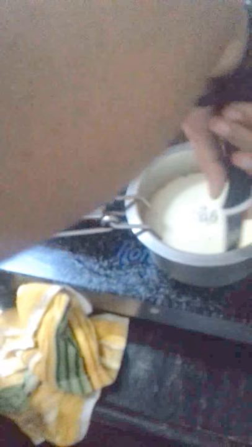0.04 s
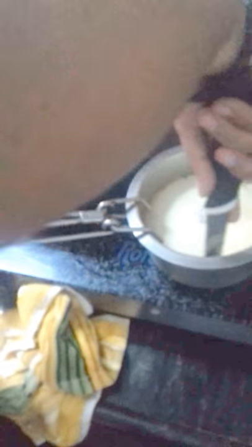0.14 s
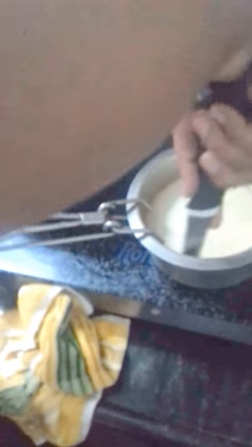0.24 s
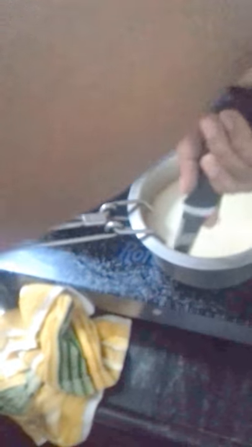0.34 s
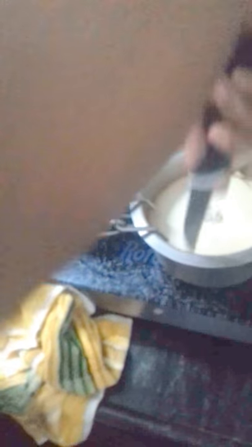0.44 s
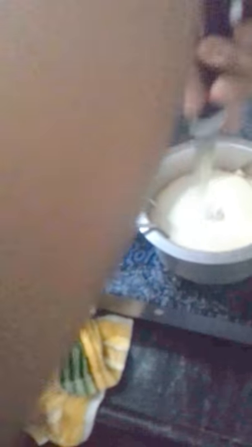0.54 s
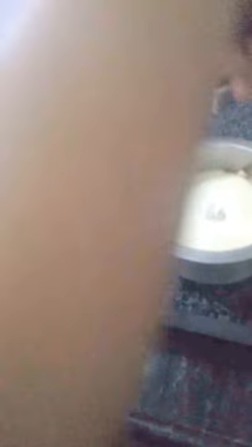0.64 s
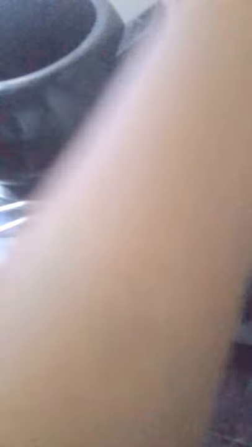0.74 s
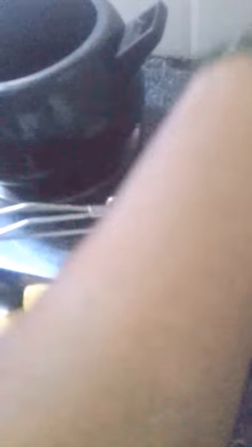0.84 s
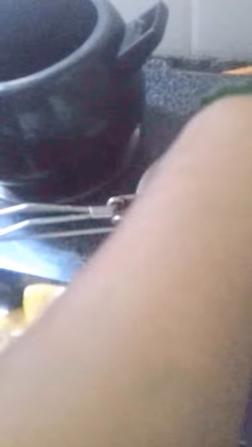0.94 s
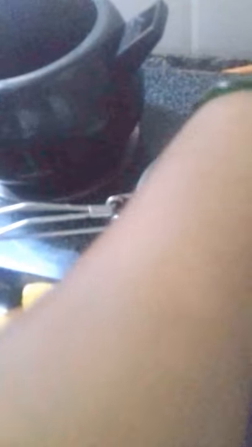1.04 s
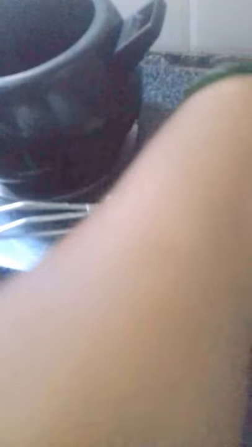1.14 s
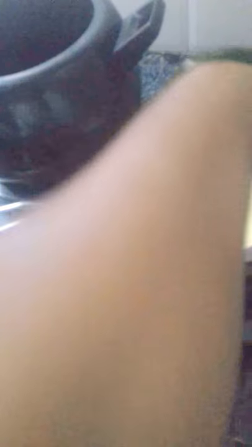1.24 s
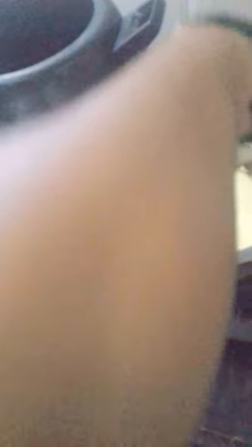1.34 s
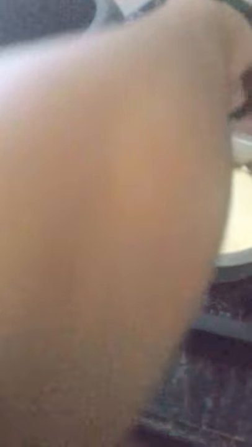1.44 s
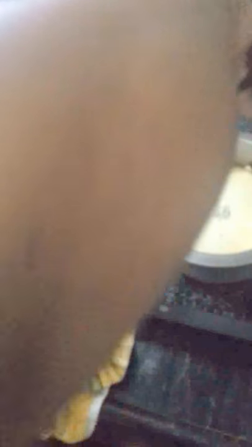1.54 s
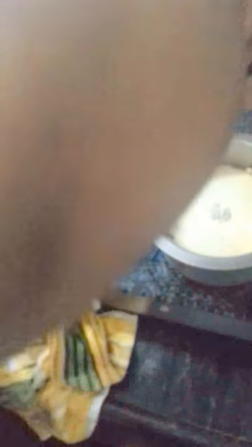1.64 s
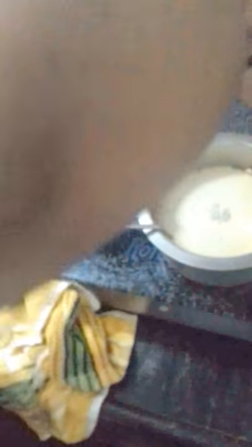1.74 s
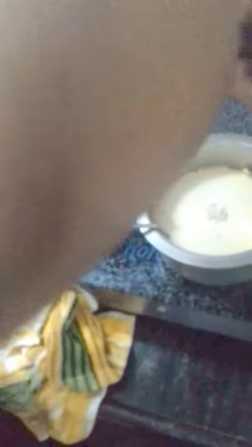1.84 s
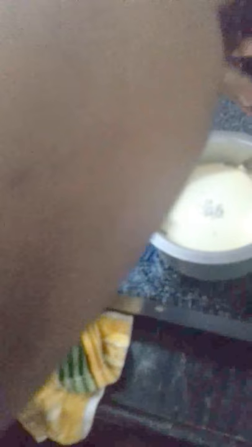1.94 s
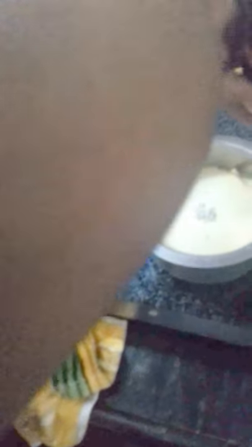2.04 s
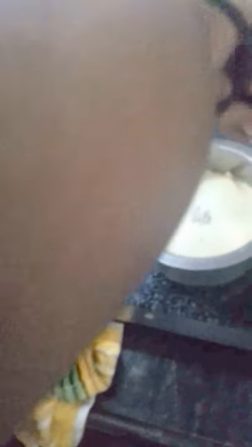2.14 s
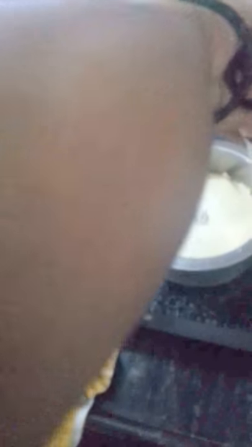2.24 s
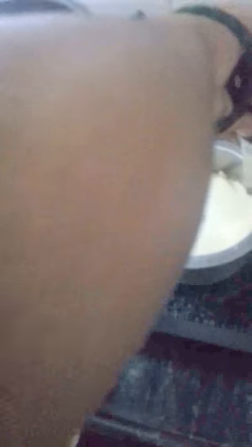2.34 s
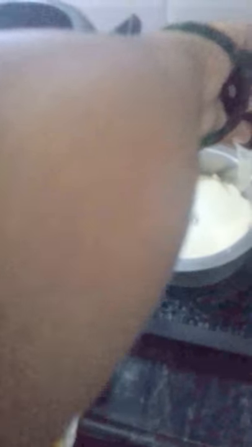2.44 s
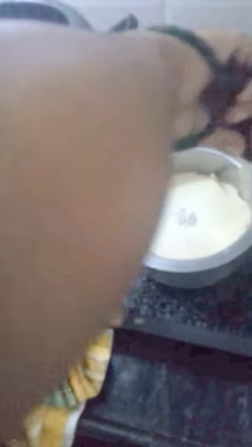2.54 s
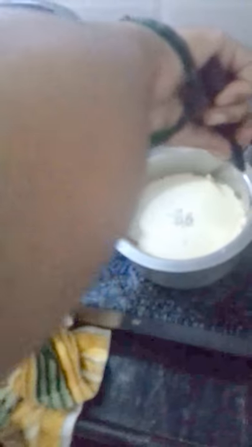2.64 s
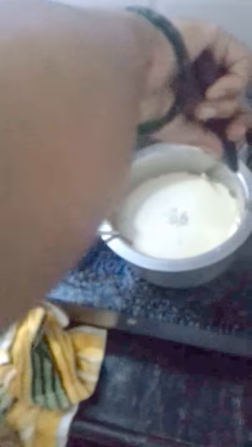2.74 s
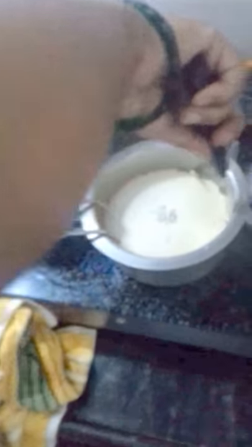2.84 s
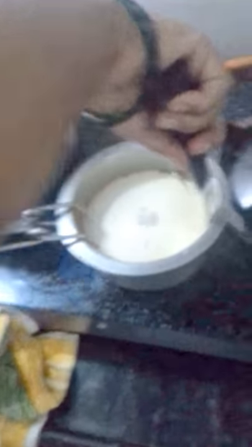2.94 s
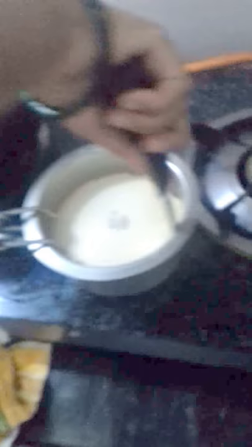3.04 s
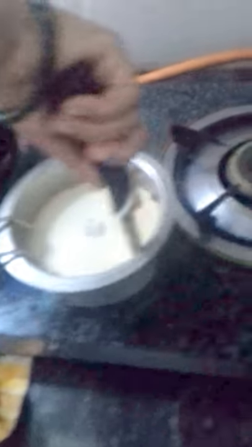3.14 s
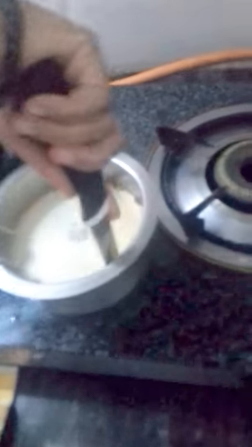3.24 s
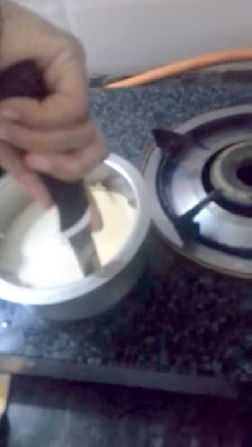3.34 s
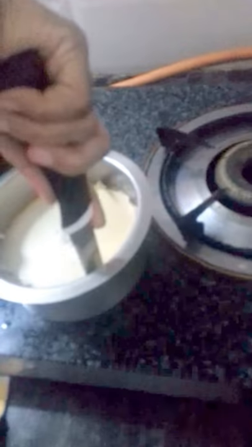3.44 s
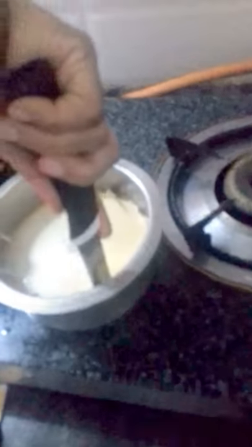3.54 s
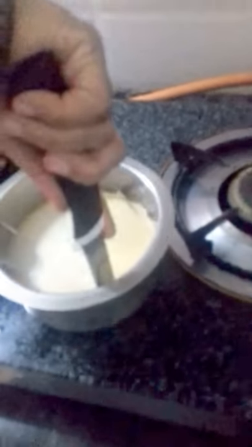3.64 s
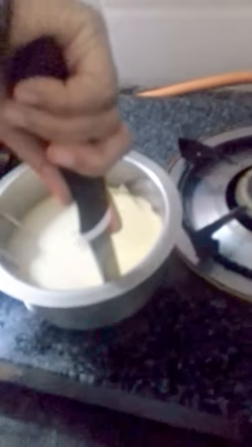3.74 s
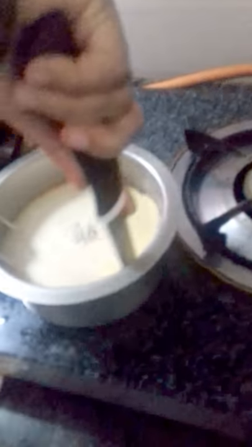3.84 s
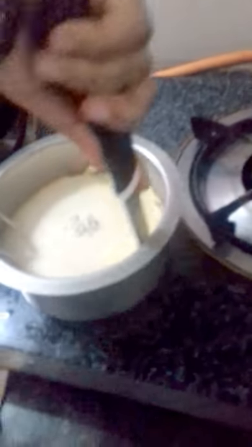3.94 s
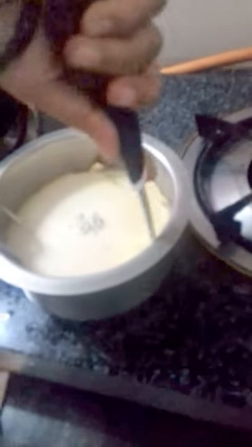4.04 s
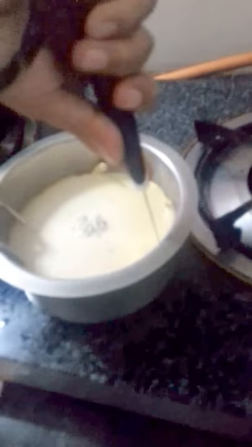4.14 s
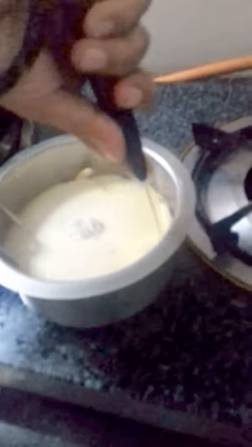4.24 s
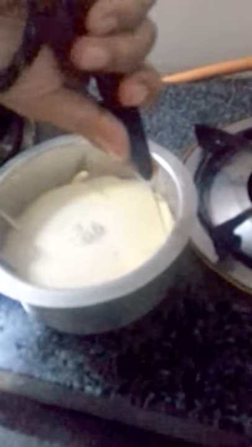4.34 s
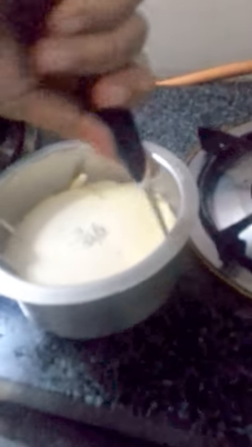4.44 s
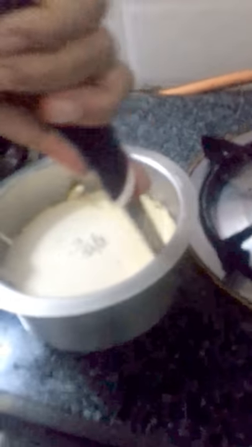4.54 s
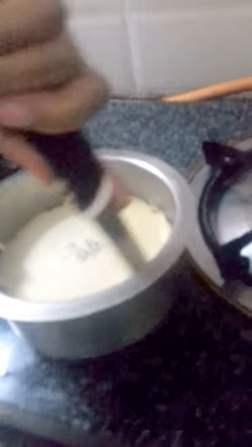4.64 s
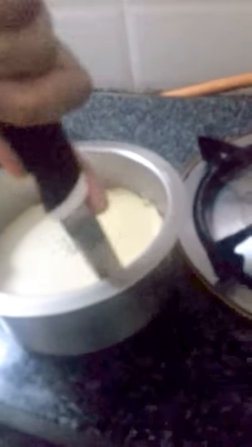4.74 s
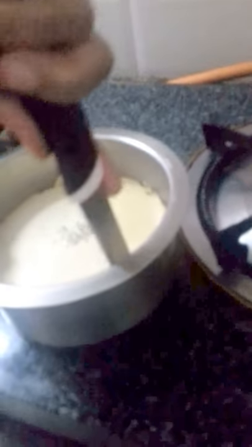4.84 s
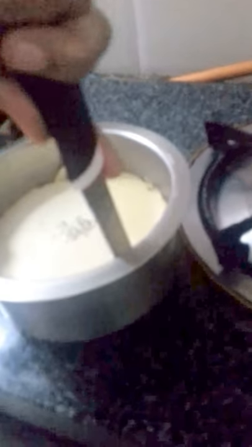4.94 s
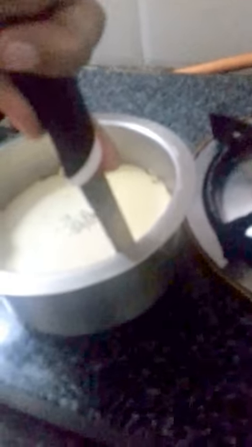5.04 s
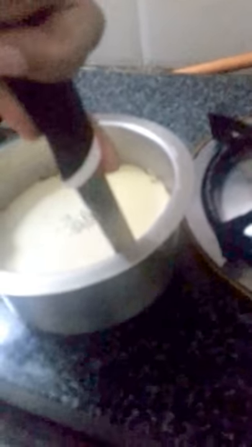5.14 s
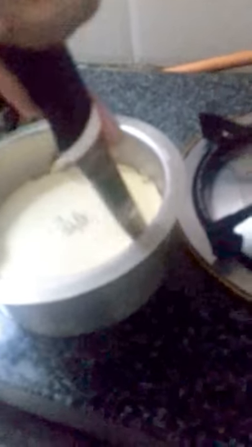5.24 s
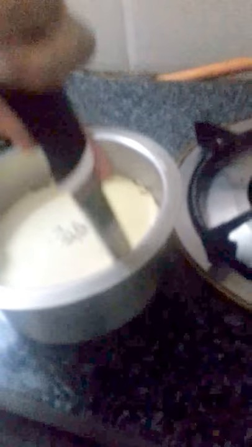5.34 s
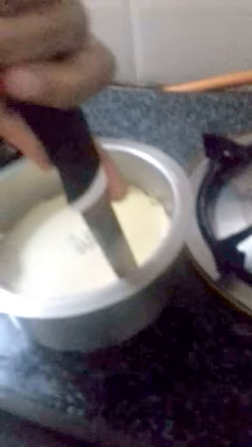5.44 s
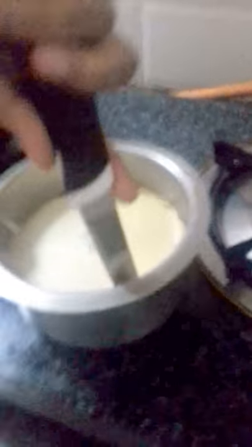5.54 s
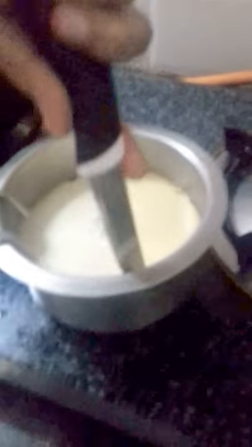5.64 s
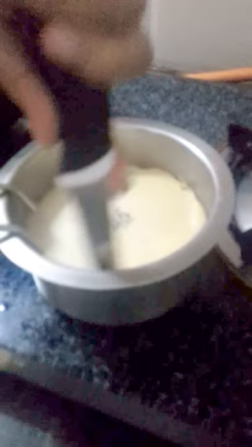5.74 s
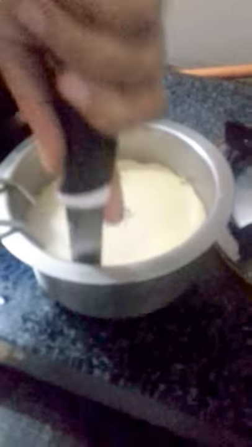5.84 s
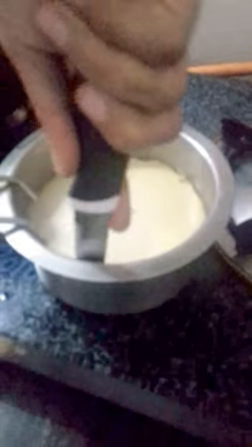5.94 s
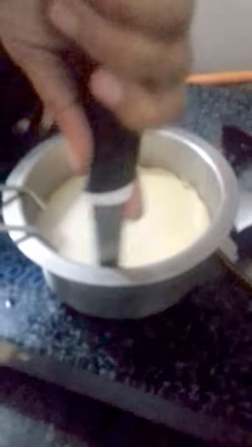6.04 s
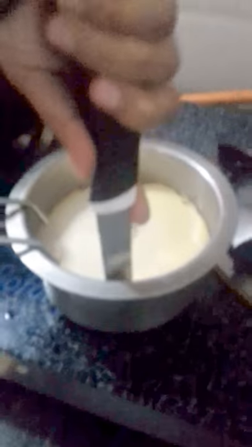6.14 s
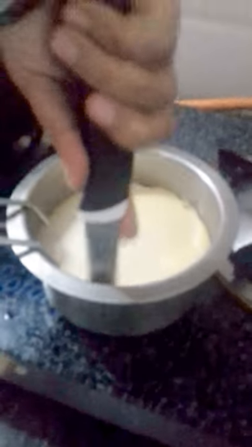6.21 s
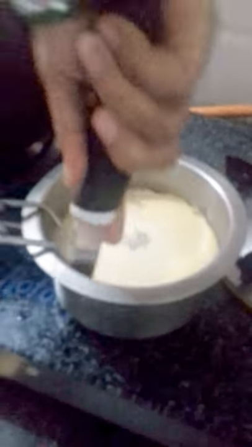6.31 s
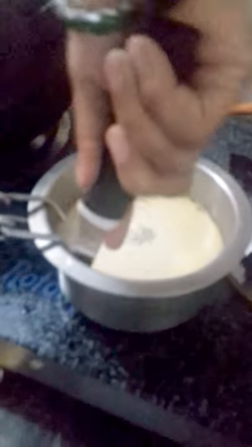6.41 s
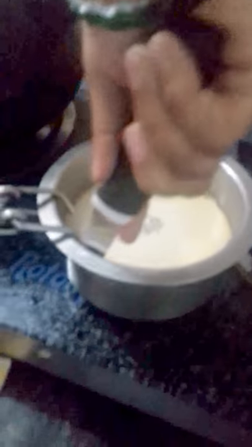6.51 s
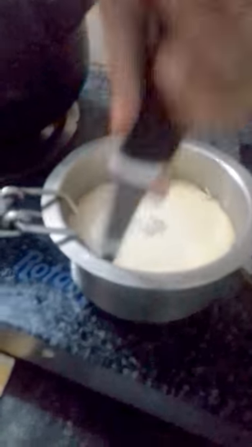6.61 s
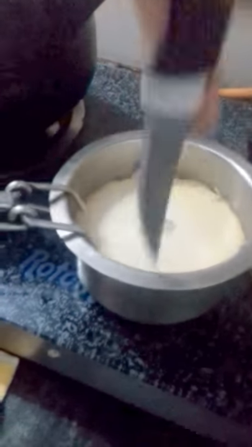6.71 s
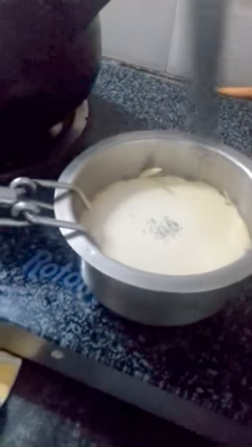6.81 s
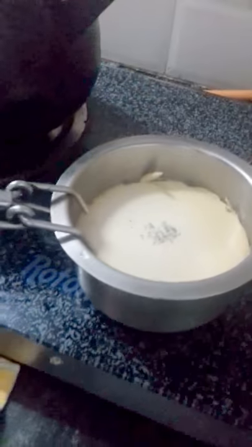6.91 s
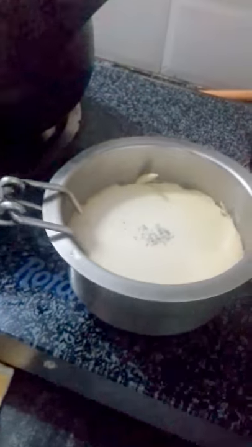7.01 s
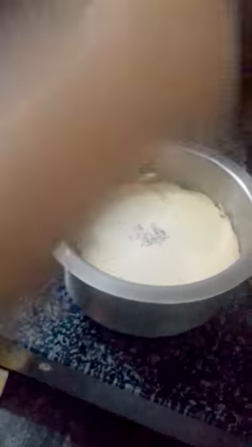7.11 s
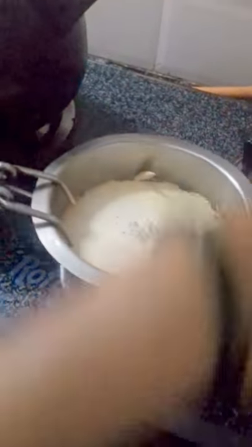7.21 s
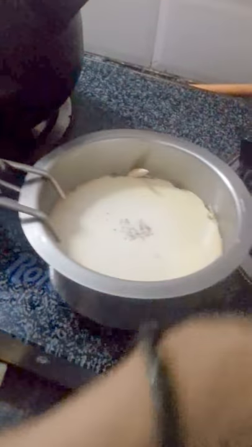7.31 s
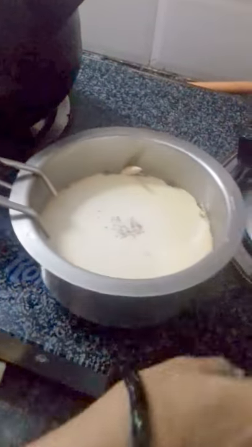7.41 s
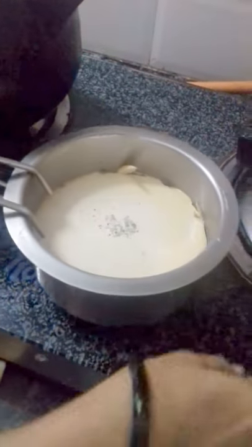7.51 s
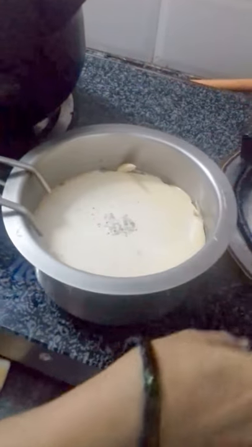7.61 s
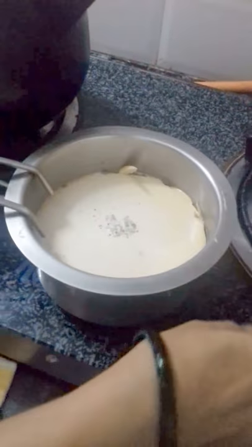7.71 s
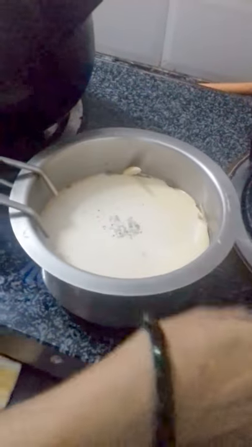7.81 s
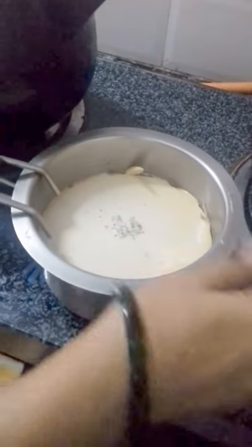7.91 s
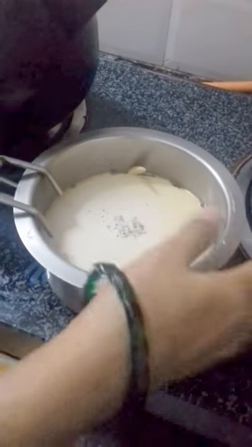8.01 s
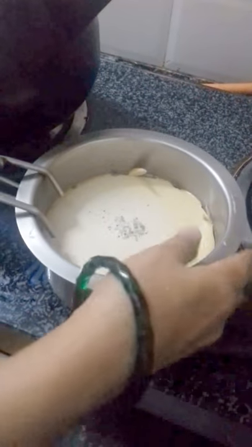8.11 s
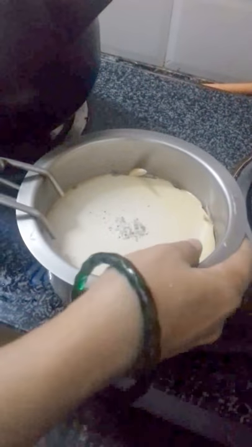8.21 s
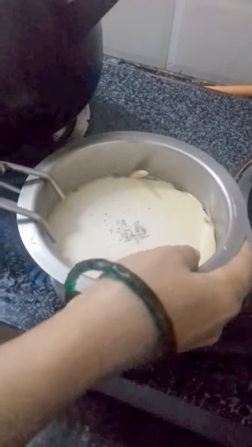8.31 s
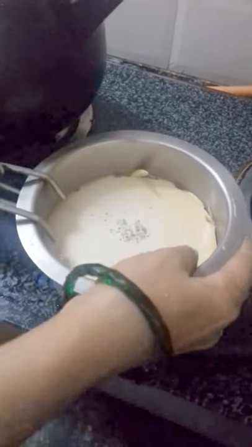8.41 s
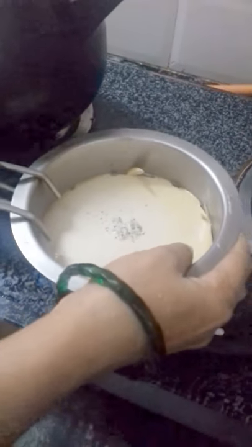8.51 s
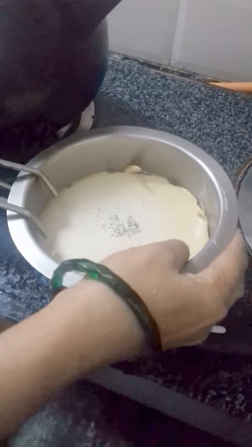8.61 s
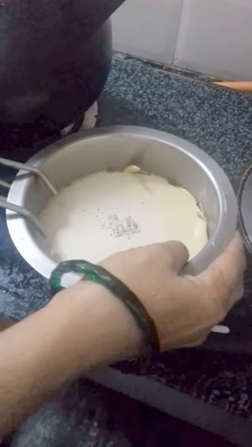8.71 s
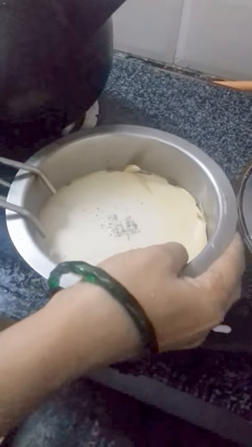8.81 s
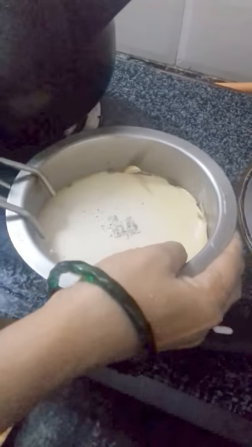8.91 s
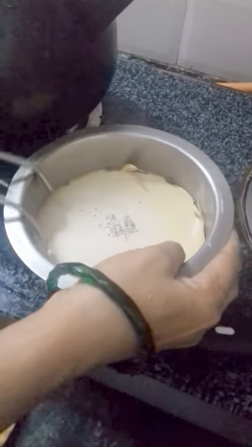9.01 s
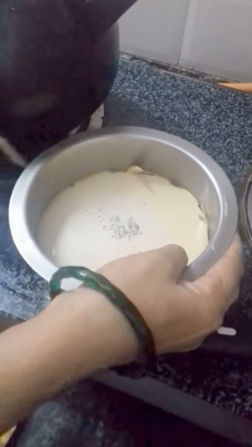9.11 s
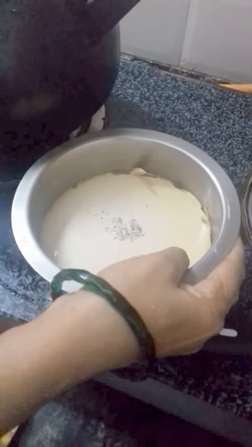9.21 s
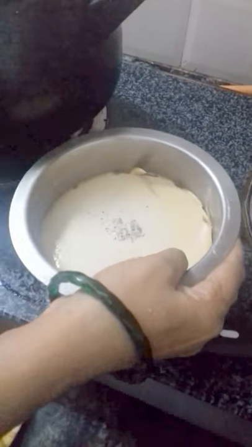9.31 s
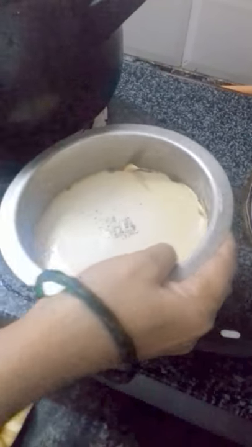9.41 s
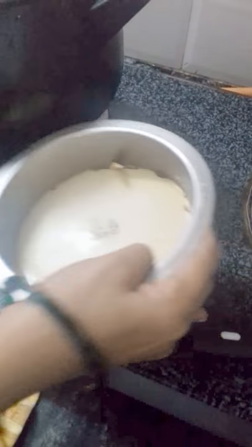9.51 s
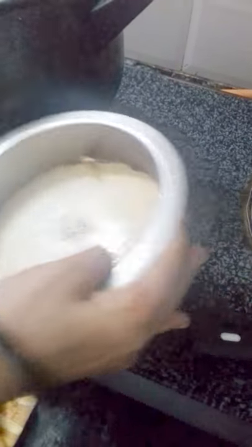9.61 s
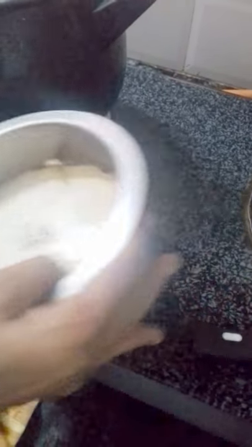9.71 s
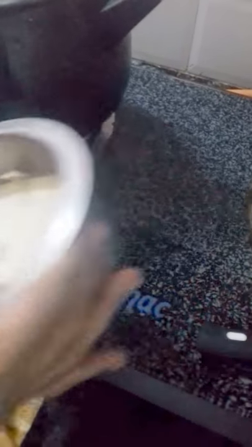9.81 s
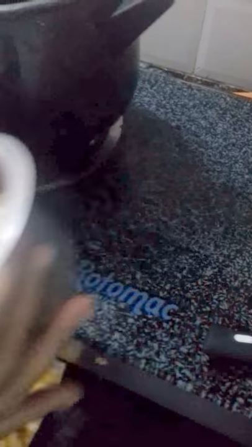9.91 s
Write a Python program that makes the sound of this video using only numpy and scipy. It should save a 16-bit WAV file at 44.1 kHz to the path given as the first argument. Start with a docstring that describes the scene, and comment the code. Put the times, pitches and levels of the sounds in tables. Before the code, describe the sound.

A blade works around the wall of a steel pot in uneven, raspy strokes with small clicks and several knocks of the pot against stone. After a quick upward squeal of metal, utensils land on the counter with a louder clatter, followed by a glassy clink and soft settling ticks. The sounds are near and sharp through a small microphone, with a short kitchen echo and a faint appliance hum.

```python
"""A knife loosens a cake from a steel pot in a quiet, tiled kitchen with a faint hum.
First the blade scrapes and ticks round the wall, and now and then the pot knocks on the stone counter.
Near 6.7 s the blade slides out with a rising squeal. From 7.5 s knife and tongs clatter down,
and a glass bangle clinks on steel. A small microphone makes the sounds near 3-4.5 kHz stand out."""
import sys
import numpy as np
from scipy import signal
from scipy.fft import rfft, irfft
from scipy.io import wavfile

SR = 44100
rng = np.random.default_rng(int(sys.argv[2]) if len(sys.argv) > 2 else 0)


def transcribe(u):
    """Save the signal u as a 16-bit wav file named by the first command-line argument.

    u: samples, shape (n,) or (channels, n), limited to [-1, 1]; the rate is SR.
    q: integer samples, one column per channel.
    """
    v = np.clip(np.atleast_2d(u).T, -1, 1)
    q = np.round(v * 32767).astype(np.int16)
    wavfile.write(sys.argv[1], SR, q)


N = 439236

# Levels compare the rows of a table. A ring_s or rattle_s is the time to fade by 60 dB.
# tone of the distant noise, and of a hiss that differs left and right: pitch_hz, level_db
DISTANT_TONE = [(15, -39), (25, -7), (149, -6), (223, -5.5), (285, -4.5), (405, -3.5), (516, -3.5),
                (714, -1), (818, -16.5), (887, -18), (1020, -4.5), (2840, -16.5), (3920, -13),
                (6050, -24.5), (16000, -28)]
HISS_TONE = [(20, -10.5), (60, -3), (150, -0.5), (500, -1.5), (1500, -2), (4000, -8), (8000, -12),
             (16000, -13.5)]
# slow drift of the distant noise: time_s, level_db
DISTANT_DRIFT = [(0, -61.5), (1.5, -63.5), (4, -62), (6.5, -64), (9.96, -63.5)]
# wavering motor tones: pitch_hz, width_hz, level_db
WAVERING_HUMS = [(459, 10, -72), (560, 14, -83.5), (819, 11, -73), (967, 33, -74)]
# steady motor tones: pitch_hz, level_db
STEADY_HUMS = [(47, -83.5), (141, -81.5), (282, -75)]
# six bands the microphone passes unequally (low, body, middle, presence, bite, treble): low_hz, high_hz
BANDS = [(275, 704), (700, 1260), (1400, 2900), (3000, 4490), (4750, 7000), (8500, 16000)]
# the room's echo, one value a band: ring_s in the first list, level_db in the second
ECHO_RING_S = [0.36, 0.45, 0.55, 0.62, 0.51, 0.33]
ECHO_DB = [3.5, -2.5, -5, -9.5, -8, -4.5]

# the notes each object rings with: pitch_hz, level_db, ring_s (blows and scraping can shorten the ring)
POT_NOTES = [(830, -6, .06), (1050, -6, .08), (1615, -4, .2), (2050, -4, .1), (2358, -4, .2),
             (3160, -6, .12), (3400, -5, .08), (3628, -4, .07), (3950, -4, .08), (4081, -8, .15),
             (4190, -4, .08), (4350, -6, .1), (4506, -8, .1), (5000, -10, .08), (5950, -10, .04),
             (7200, -3, .03), (9300, -2, .035), (12600, 4, .03), (14900, -5, .03)]
COUNTER_NOTES = [(230, -3.5, .14), (308, 10.5, 0.011), (353, 12, 0.36), (421, 6.5, 0.18), (445, -16, 0.047),
                 (580, 2, 0.1), (707, -14, .08), (819, 12, 0.064), (900, 9, 0.27), (1000, -10, 0.089),
                 (1135, -17, .08), (1287, -27, .06), (1933, 5, .06)]
TOOL_NOTES = [(270, 1, 0.75), (345, 11, 0.35), (430.5, 2, .2), (599, 7, 0.3), (685, 8.5, 0.6),
              (816.5, 15, 0.1), (1010, 2.5, .25), (1208, -7, 0.097), (1590, -3.5, 0.26), (1940, 3, 0.45),
              (2354, -4.5, 0.11), (2649.5, 6, 0.12), (2720, -10, 0.11), (3260, 1.5, 0.17), (3040, -18, .17),
              (3450, -0.5, .15), (3335, -2, 0.11), (3570, -9, 0.096), (3920, -4, 0.26), (3890, 14, 0.6),
              (4580, -6, 0.13), (4674, -11, 0.067), (5100, -32.5, 0.11)]
BANGLE_NOTES = [(6800, 12, 0.054), (8930, 13, 0.15), (11500, -1, 0.044), (13500, -3, 0.033)]
HANDLE_NOTES = [(760, 1.5, 0.061), (1020, -11, 0.032)]
# light taps: start_s, level_db
BANGLE_TAPS = [(8.1628, -38), (8.4731, -60)]  # glass on steel
HANDLE_TAPS = [(7.557, -24), (7.612, -36), (7.647, -38), (7.664, -34), (7.69, -40), (7.745, -29),
               (9.078, -42), (9.125, -45)]  # handle on stone
# blows: start_s, presence_db, low_db, middle_db, treble_db, rattle_s
SHARP_TICKS = [(0.4804, -41, -47.5, -61, -58, 0.016), (0.5872, -41, -64, -43.5, -73.5, 0.021),
               (2.7442, -44, -52, -72, -56, 0.014), (3.2906, -43, -53, -45.5, -63, 0.041),
               (3.5779, -39, -50, -37, -73, 0.037), (4.0717, -35, -68, -48, -75, 0.017),
               (4.255, -30.5, -48.5, -59, -60, 0.014), (4.3934, -37.5, -65, -48, -55, 0.023),
               (4.4453, -27.5, -65, -39, -62, 0.0085), (5.256, -24, -64, -40, -44, 0.0073),
               (5.9235, -33, -57, -41, -62, 0.014), (6.2807, -30, -48, -45, -65, 0.039),
               (6.3276, -30, -34.5, -31.5, -50, 0.026), (6.3586, -42, -42, -64, -45, 0.022),
               (6.4644, -46, -44.5, -43.5, -59, 0.025), (6.545, -45, -56, -63, -63, 0.018),
               (6.6245, -48, -48, -49.5, -72, 0.058), (6.6785, -40, -65, -61, -58, 0.016),
               (6.712, -40, -66, -61, -58, 0.016), (9.2424, -46, -63, -58, -52, 0.027)]  # blade on the pot wall, and one last bright click as the tools settle
RIM_CLINKS = [(0.4579, -44, -70, -50, -63, 0.012), (0.4984, -46, -58, -40, -66, 0.012),
              (1.0877, -32, -53, -43, -41, 0.029)]  # blade on the bare rim, which rings on
POT_KNOCKS = [(0.6563, -62, -38, -66, -76, 0.032), (4.4831, -23, -26, -35, -38.5, 0.034),
              (4.9534, -33, -34, -37.5, -48, 0.032), (5.4035, -21, -25, -27, -40.5, 0.033),
              (6.0879, -44, -27.5, -50, -70, 0.059)]  # pot rocks onto the counter
TOOL_CLATTER = [(7.557, -20.5, -36.5, -21.5, -59, 0.059), (7.6107, -21.5, -37.5, -28, -42, 0.049),
                (7.646, -32.5, -41.5, -31.5, -41, 0.045), (7.6694, -37, -35, -49, -55, 0.11),
                (7.7444, -32.5, -39, -34.5, -48, 0.083), (7.7697, -7.5, -27, -17, -62, 0.17),
                (7.7991, -18.5, -22.5, -16, -36, 0.12), (8.1628, -22.5, -48.5, -27, -34, 0.014),
                (8.1744, -37, -39, -33.5, -65, 0.17), (8.2592, -40.5, -40.5, -39, -77, 0.029),
                (8.4714, -33.5, -71, -34, -55, 0.071), (8.4995, -45.5, -44, -63.5, -73.5, 0.064),
                (8.961, -51, -44.5, -70, -64, 0.065), (8.984, -45.5, -44.5, -49, -69, 0.035),
                (9.0295, -46, -68, -40, -64, 0.032), (9.0503, -33.5, -83, -33.5, -57, 0.021),
                (9.0773, -44, -43, -50, -53, 0.065), (9.1165, -34.5, -74, -53, -65, 0.028),
                (9.134, -42, -65, -54, -68, 0.025), (9.1451, -34.5, -69, -60, -68, 0.031)]  # knife and tongs land on the counter

# the blade slides out: time_s, level_db, pitch_factor
BLADE_SLIDE = [(6.62, -96, 1.0), (6.66, -72, 1.1), (6.71, -50, 1.07), (6.755, -51.5, 1.22),
               (6.775, -52, 1.24), (6.8, -78, 1.25)]
# the notes it sings: pitch_hz, level_db, width_hz, share_of_rise
BLADE_NOTES = [(780, -8, 37, 0), (2750, -10, 200, 0.74), (3650, -1, 250, 0.82), (4400, -1.5, 220, 0.81),
               (6570, -12, 120, 0.035), (9240, -18, 120, 0.056)]
# pushes of the blade on steel, the last ones the pot dragging on the stone counter (middle and treble add to
# level): start_s, rise_s, hold_s, fall_s, level_db, middle_db, treble_db, edge_pitch_hz
PUSHES = [(0.0, 0.084, 0.12, .03, -52.5, -7.5, -25, 3840), (.19, 0.089, 0.043, 0.046, -40, -12, -27, 3600),
          (0.344, .03, 0.055, 0.04, -55, -9, -14, 3900), (0.423, 0.034, .015, .02, -46.5, -8, -17, 3820),
          (0.471, .008, 0.014, 0.018, -36, -8.5, -24, 4100), (1.1, 0.0083, .02, 0.18, -52, -11, -18, 3930),
          (1.235, 0.026, .06, .05, -63, -11, -18, 3970), (1.38, 0.042, 0.032, .03, -63, -5, -16, 3940),
          (1.458, .02, .035, 0.034, -58.5, -11, -18, 3880), (1.606, 0.1, .01, .07, -61, -9, -23, 3880),
          (1.913, 0.074, 0.0093, 0.048, -52.5, -12, -23, 3700),
          (2.081, 0.017, .005, 0.022, -55, -24, -21, 3560),
          (2.132, 0.019, 0.044, .06, -57.5, -9, -30, 3650),
          (2.306, 0.027, .005, 0.042, -54, -11, -18, 3880),
          (2.516, 0.07, 0.069, 0.035, -47, -2.5, -23.5, 3740),
          (2.72, 0.027, 0.0045, 0.022, -53.5, -7, -19, 3940),
          (2.879, 0.036, 0.027, 0.018, -50.5, -7, -22, 3850), (2.956, 0.048, .005, .02, -52, -8, -21, 4020),
          (3.061, 0.023, 0.082, 0.059, -47.5, -12.5, -26, 4030),
          (3.152, 0.03, .03, .03, -40, -12, -27, 3920), (3.24, .035, 0.019, 0.035, -48, -9.5, -23, 3930),
          (3.344, 0.033, 0.036, 0.039, -48.5, -7, -20, 3850),
          (3.501, 0.044, .005, 0.025, -57, -5, -33, 3520),
          (3.59, 0.13, 0.018, 0.028, -60.5, -12, -31, 3570),
          (3.784, 0.051, .005, 0.055, -38, -9.5, -31, 3280), (3.839, .01, 0.056, .03, -44, -8.5, -35, 3300),
          (3.906, .02, 0.054, .025, -54, -10, -29, 3240), (4.07, .015, 0.043, 0.13, -69, -2, -25, 4050),
          (4.17, 0.033, 0.038, .02, -53, -7, -30, 3600), (4.223, 0.059, .005, 0.12, -41.5, -5.5, -32, 3480),
          (4.567, 0.051, .01, 0.12, -49, -9, -25, 3530), (4.636, .1, 0.012, 0.035, -47, -11.5, -26, 3420),
          (4.782, 0.022, .005, 0.024, -46, -13, -27, 3730),
          (4.854, 0.015, 0.0044, .015, -53.5, -18, -25, 3840),
          (4.885, 0.013, 0.0039, 0.011, -55, -20, -30, 3880),
          (5.219, 0.013, .006, .015, -50, -20, -25, 4000),
          (5.251, 0.0034, .006, 0.028, -37.5, -13.5, -30, 3650),
          (5.353, 0.029, .005, 0.013, -52.5, -8, -20, 3990),
          (5.467, 0.042, 0.011, 0.056, -57.5, -20, -14, 3890),
          (5.52, 0.039, 0.082, 0.36, -55.5, -7.5, -23, 3400),
          (5.766, 0.03, .01, .015, -44.5, -13, -17, 3800), (5.801, 0.02, 0.02, 0.038, -41, -8, -15.5, 3770),
          (5.885, 0.025, 0.015, 0.0078, -41, -4, -19, 4200),
          (6.089, 0.0093, 0.048, 0.024, -48.5, -5.5, -12.5, 4030),
          (6.226, 0.048, 0.0043, 0.053, -42, -7, -17.5, 3670),
          (6.302, 0.023, 0.041, 0.062, -36, -11, -27, 4400),
          (6.402, 0.032, 0.011, .03, -47.5, -8, -18, 3970),
          (6.577, 0.055, 0.047, 0.027, -47.5, -15.5, -22, 4170),
          (6.674, 0.027, 0.074, .03, -50.5, -10, -12, 4700),
          (7.625, 0.031, .005, 0.035, -34.5, -4.5, -34, 4270),
          (8.162, 0.0092, 0.0061, .045, -31, -2.5, -23, 3380),
          (9.094, .04, .01, 0.032, -47.5, -4.5, -17, 3970)]
# how strongly the wall's highest notes sing under the blade: time_s, level_db
TREBLE_SINGING = [(0, -4), (3.5, -1), (3.9, 2.5), (5.6, 4), (5.8, -3), (6.4, 5), (6.8, -23), (7, -12.5),
                  (9.96, -18.5)]


def amp(db):
    """Turn decibels into a gain."""
    return 10 ** (np.asarray(db) / 20)


def rms_one(x):
    """Scale a signal to an average power of 1."""
    return x / np.sqrt(np.mean(x ** 2) + 1e-20)


def in_time(rows):
    """Join timed points with straight lines, one curve a column."""
    times_s, *columns = np.transpose(rows)
    return [np.interp(np.arange(N) / SR, times_s, column) for column in columns]


def band_of(hz):
    """Pick the band, 0 to 5, for a pitch."""
    return int(np.searchsorted([720, 1400, 2800, 5400, 8500], hz))


def ring(x, hz, ring_s):
    """Each click in x starts a fading note."""
    decay, angle = amp(-60 / (ring_s * SR)), 2 * np.pi * hz / SR
    return signal.lfilter([.5, 0, -.5], [1, -2 * decay * np.cos(angle), decay ** 2], x + 1e-18)


def clicks(taps):
    """Place one click for each tap."""
    out = np.zeros(N)
    for start_s, level_db in taps:
        out[round(start_s * SR)] = amp(level_db)
    return out


def shaped_noise(tone):
    """Steady noise with the given level at each pitch."""
    hz, level_db = np.transpose(tone)
    all_hz = np.fft.rfftfreq(N, 1 / SR) + 1
    gains = amp(np.interp(np.log(all_hz), np.log(hz), level_db))
    return rms_one(irfft(rfft(rng.standard_normal(N)) * gains, N))


def background():
    """Distant street and house noise with a few wavering motor tones."""
    out = shaped_noise(DISTANT_TONE) * amp(in_time(DISTANT_DRIFT)[0] - 0.5)
    for hz, width_hz, level_db in WAVERING_HUMS:
        out += amp(level_db) * rms_one(ring(rng.standard_normal(N), hz, 0.79 / width_hz))
    return out


def motor():
    """A far appliance hums on multiples of its lowest pitch."""
    t = np.arange(N) / SR
    return sum(amp(level_db) * np.sin(2 * np.pi * hz * t) for hz, level_db in STEADY_HUMS)


def wide_hiss(level_db=-71):
    """A faint hiss, opposite in the left and right channels."""
    return amp(level_db) * shaped_noise(HISS_TONE) * np.array([[1], [-1]])


def kitchen(bands):
    """Each band arrives directly, then as a dense echo off the tiles."""
    out, t = 0, np.arange(int(.7 * SR)) / SR
    for band, (low_hz, high_hz) in enumerate(BANDS):
        band_pass = signal.butter(3 if band else 2, [low_hz, high_hz], "band", fs=SR, output="sos")
        direct = signal.sosfilt(band_pass, bands[band] + 1e-18)
        direct *= np.sqrt(SR / 2 / (high_hz - low_hz))  # noise keeps its power in any band
        tail = rng.standard_normal(len(t)) * amp(-60 * t / ECHO_RING_S[band]) * np.minimum(t / 0.004, 1)
        echo = signal.fftconvolve(direct, tail / np.sqrt(np.sum(tail ** 2)))[:N]
        out = out + direct + amp(ECHO_DB[band]) * echo
    return out


def bangle():
    """A thin glass ring touches steel and gives a few high, clean notes."""
    taps = clicks(BANGLE_TAPS) * amp(-22.5)
    return sum(amp(level_db) * ring(taps, hz, ring_s) for hz, level_db, ring_s in BANGLE_NOTES)


def handle():
    """Soft taps on the stone set a hollow handle ringing briefly."""
    taps = signal.lfilter([.15], [1, -.85], clicks(HANDLE_TAPS))
    return sum(amp(level_db) * ring(taps, hz, ring_s) for hz, level_db, ring_s in HANDLE_NOTES)


def thumps():
    """The stone slab answers each knock of the pot with a short, low thud."""
    knocks = clicks((start_s, low_db - 23.5) for start_s, _, low_db, *_ in POT_KNOCKS)
    softened = signal.lfilter([.1], [1, -.9], knocks)
    return ring(softened, hz=126, ring_s=0.12)


def blows(table, notes, crack_db, ring_db, top_loss_db, body_db, spread_db, longest_s):
    """Each blow is a sharp click and a dying rattle that set the object ringing; gives six bands."""
    out, shakes = np.zeros((6, N)), np.zeros((len(notes), N))
    t = np.arange(SR // 8) / SR
    spots_db = spread_db * rng.standard_normal((len(table), len(notes)))  # each spot favours other notes
    note_bands = [band_of(hz) for hz, _, _ in notes]
    for (start_s, presence_db, low_db, middle_db, treble_db, rattle_s), spot_db in zip(table, spots_db):
        start = round(start_s * SR)
        span = slice(start, start + len(t))
        bands_db = np.array([low_db, (low_db + middle_db) / 2 + body_db, middle_db,
                             presence_db, treble_db, treble_db - top_loss_db])
        rattle = np.tile(rng.standard_normal(len(t)) * amp(-60 * t / rattle_s), (6, 1))
        rattle[:2] *= 0.54  # the two lowest bands feel little of the rattle
        rattle[:2, 0], rattle[2:, 0] = 11.06, 4.1  # the click of first contact
        out[:, span] += amp(bands_db + crack_db)[:, None] * rattle
        shakes[:, span] += amp(bands_db[note_bands] + ring_db + spot_db)[:, None] * rattle[note_bands]
    for shake, band, (hz, level_db, ring_s) in zip(shakes, note_bands, notes):
        out[band] += amp(level_db) * ring(shake, hz, min(ring_s, longest_s))
    return out


def blade_squeal():
    """The blade sings unsteady notes; those of its free length climb as it slides out."""
    level_db, pitch_factor = in_time(BLADE_SLIDE)
    span = slice(round(BLADE_SLIDE[0][0] * SR), round(BLADE_SLIDE[-1][0] * SR))
    out = np.zeros(N)
    for hz, note_db, width_hz, share in BLADE_NOTES:
        pitch_hz = hz * (1 + share * (pitch_factor[span] - 1))
        phase = 2 * np.pi * np.cumsum(pitch_hz) / SR
        smoothing = np.exp(-np.pi * width_hz / SR)
        waver = rms_one(signal.lfilter([1], [1, -smoothing], rng.standard_normal((2, len(phase)))))
        out[span] += amp(level_db[span] + note_db) * (waver[0] * np.cos(phase) + waver[1] * np.sin(phase))
    return out


def blade_pushes(fade_db=20.5):
    """Each push swells, holds and fades; gives six band gains and the pitch the edge favours."""
    power, weighted_pitch = np.zeros((6, N)), np.zeros(N)
    t = np.arange(N) / SR
    for start_s, rise_s, hold_s, fall_s, level_db, middle_db, treble_db, edge_hz in PUSHES:
        peak_s = start_s + rise_s
        span = slice(round(start_s * SR), round((peak_s + hold_s + 2 * fall_s) * SR))
        off_peak = np.maximum((peak_s - t[span]) / rise_s, (t[span] - peak_s - hold_s) / fall_s)
        push = amp(level_db - fade_db * np.maximum(off_peak, 0)) ** 2
        body_db, bite_db = -8.5 + 0.95 * middle_db, -8 + 0.28 * treble_db
        power[1:, span] += amp([body_db, middle_db, 0, bite_db, treble_db])[:, None] ** 2 * push
        weighted_pitch[span] += edge_hz * push
    return np.sqrt(power), (weighted_pitch + 4e-9) / (power[3] + 1e-12)


def scrape(catches_per_s=15000, size_db=2, judder_db=2, sing_db=-23, wander_db=7):
    """The edge catches on tiny ridges in uneven clumps; the catches hiss and make the pot sing."""
    judder = rms_one(signal.lfilter([1], [1, -2 * .985, .985 ** 2], rng.standard_normal(N)))
    sizes = amp(size_db * np.minimum(rng.exponential(1, N), 4)) * rng.choice([-1, 1], N)
    caught = rng.random(N) < catches_per_s / SR
    gains, edge_hz = blade_pushes()
    catches = rms_one(sizes * caught * amp(judder_db * judder)) * gains * amp(-6.5)
    out = catches.copy()
    treble_db = in_time(TREBLE_SINGING)[0]
    for hz, note_db, ring_s in POT_NOTES:
        band = band_of(hz)
        # the moving blade favours other notes every tenth of a second
        spot_db = wander_db * np.interp(np.arange(N), np.linspace(0, N, num=100), rng.standard_normal(100))
        if band < 3:  # the cake muffles the low notes
            band_db = -14
        elif band == 3:  # notes near the pitch of the edge sing loudest
            band_db = -5 - np.minimum(400 * np.log(hz / edge_hz) ** 2, 18)
        else:
            band_db = treble_db
        shake = catches[band] * amp(note_db + sing_db + spot_db + band_db)
        out[band] += ring(shake, hz, 0.18 * ring_s)  # the pressing blade shortens the ring
    return out


def scene():
    """Blows and scraping echo in the kitchen; the smaller sounds and the background join them."""
    hits = blows(SHARP_TICKS, POT_NOTES, crack_db=-4.5, ring_db=-60,
                 top_loss_db=3.5, body_db=0, spread_db=5.2, longest_s=.25)
    hits += blows(RIM_CLINKS, POT_NOTES, crack_db=-5, ring_db=-38.5,
                  top_loss_db=11, body_db=-4, spread_db=1.7, longest_s=.25)
    hits += blows(POT_KNOCKS, COUNTER_NOTES, crack_db=-7.5, ring_db=-56.5,
                  top_loss_db=8.9, body_db=1.5, spread_db=0.82, longest_s=.085)
    hits += blows(TOOL_CLATTER, TOOL_NOTES, crack_db=-6.5, ring_db=-58,
                  top_loss_db=21, body_db=3, spread_db=3.13, longest_s=.11)
    bass_cut = signal.butter(2, 180, "high", fs=SR, output="sos")
    near = signal.sosfilt(bass_cut, kitchen(hits + scrape()) + bangle())
    near += thumps() + handle() + blade_squeal()
    return near + background() + motor() + wide_hiss()


def record(dry):
    """The highest treble is cut steeply."""
    stop_hz = 15950
    return signal.sosfilt(signal.cheby2(14, 50, stop_hz, fs=SR, output="sos"), dry)


dry = scene()
out = record(dry)
transcribe(out)
```